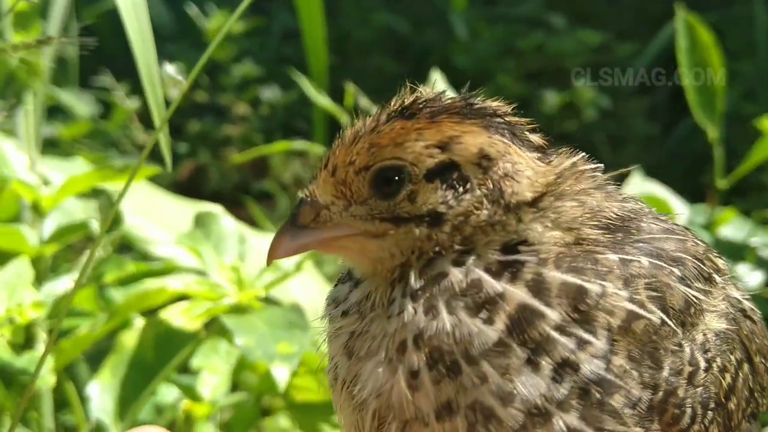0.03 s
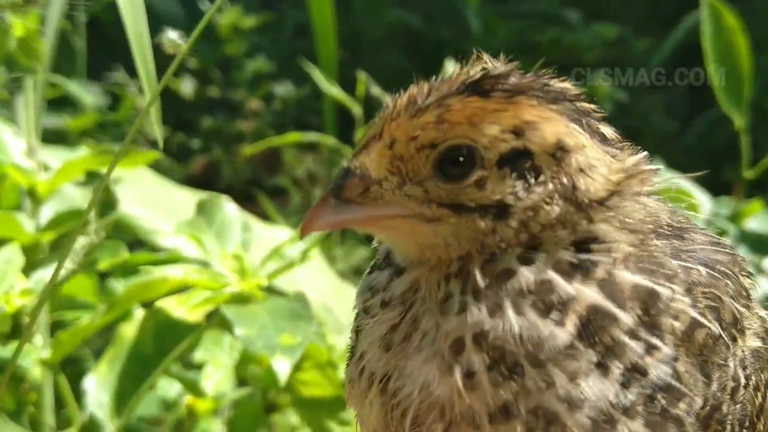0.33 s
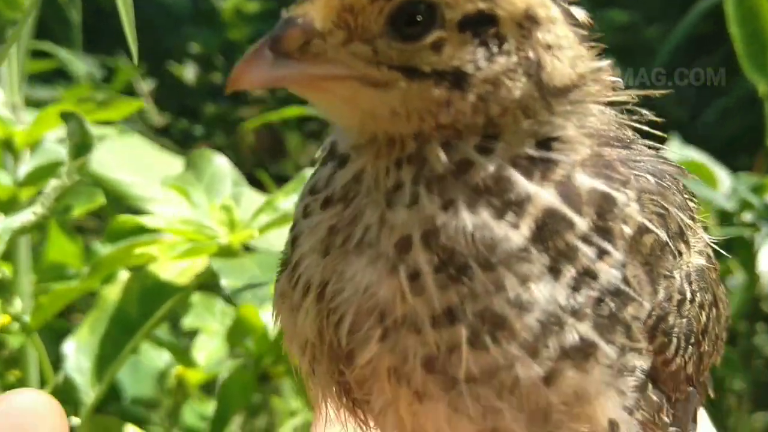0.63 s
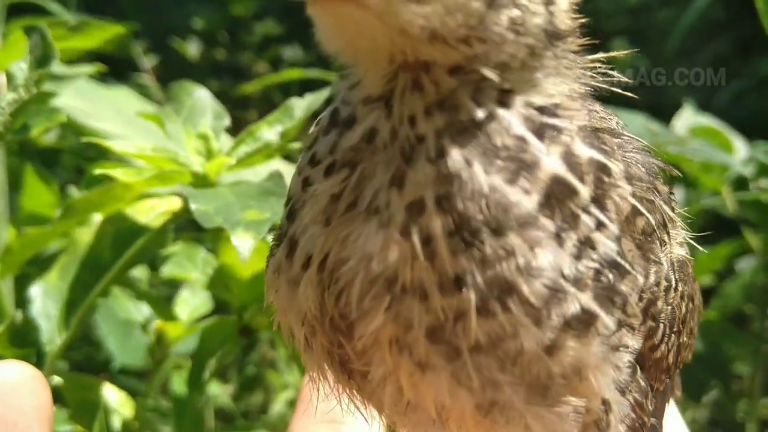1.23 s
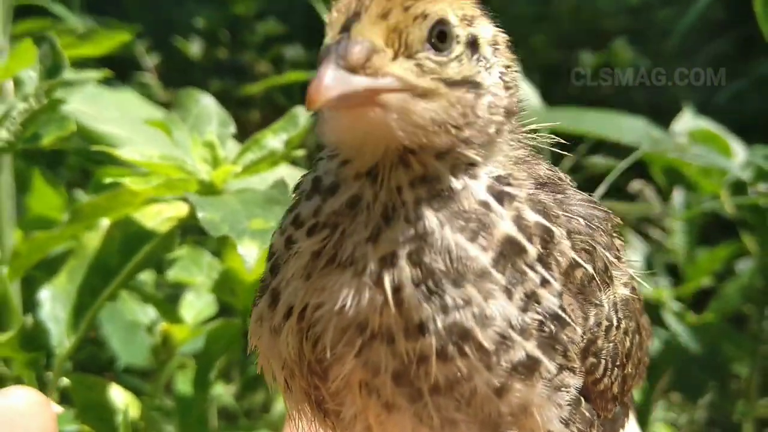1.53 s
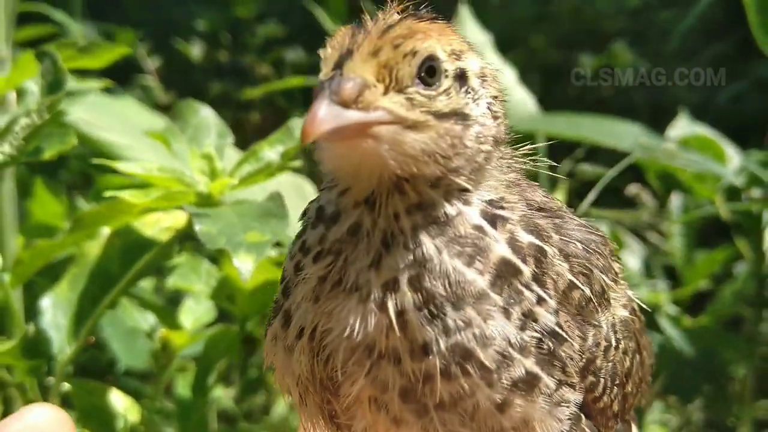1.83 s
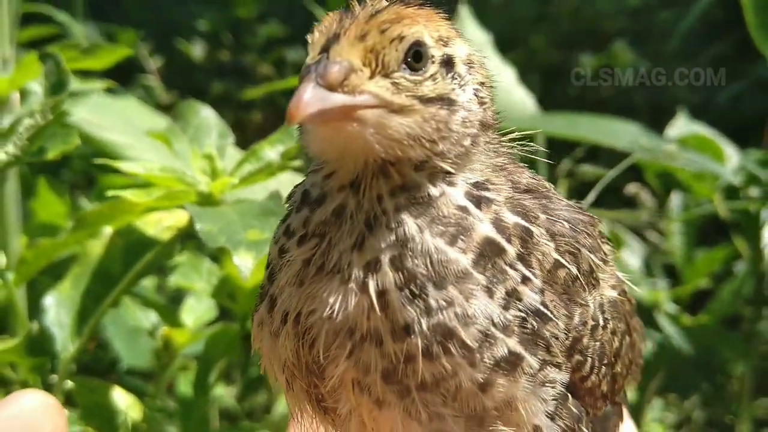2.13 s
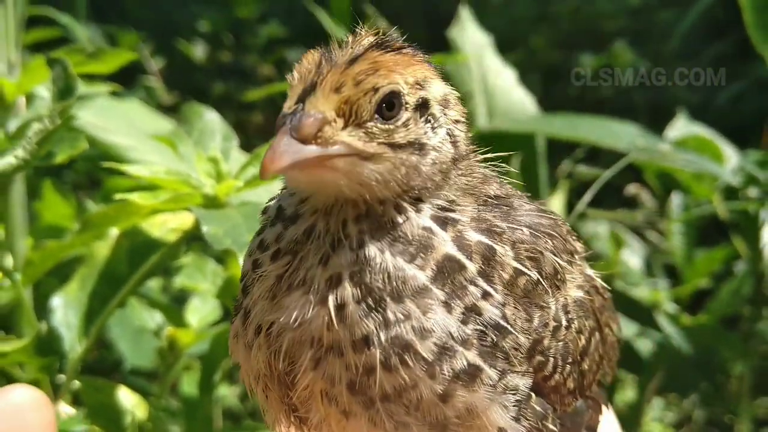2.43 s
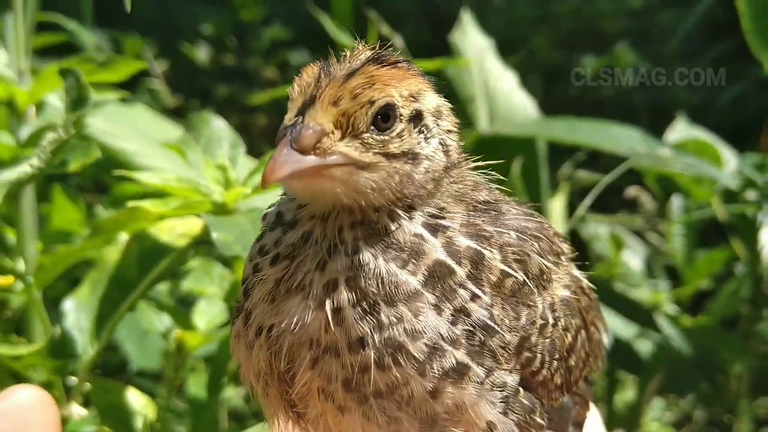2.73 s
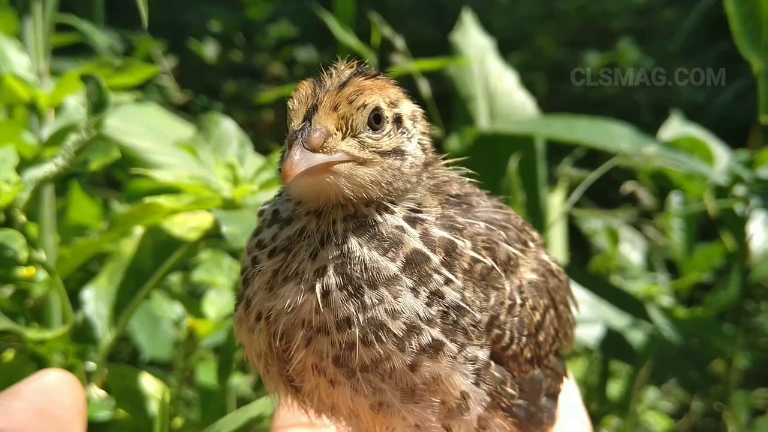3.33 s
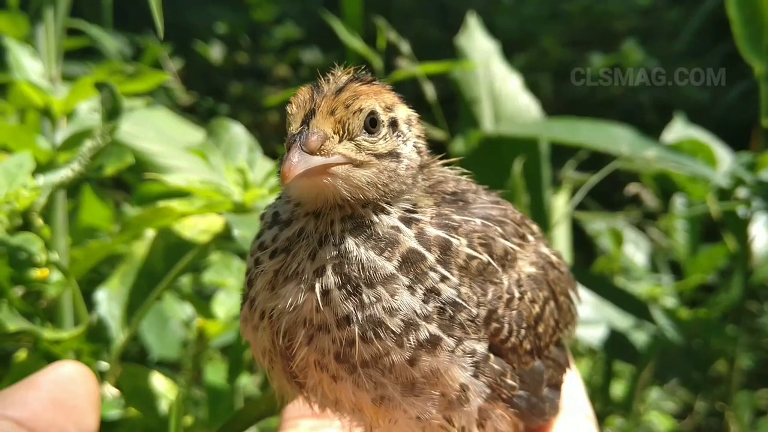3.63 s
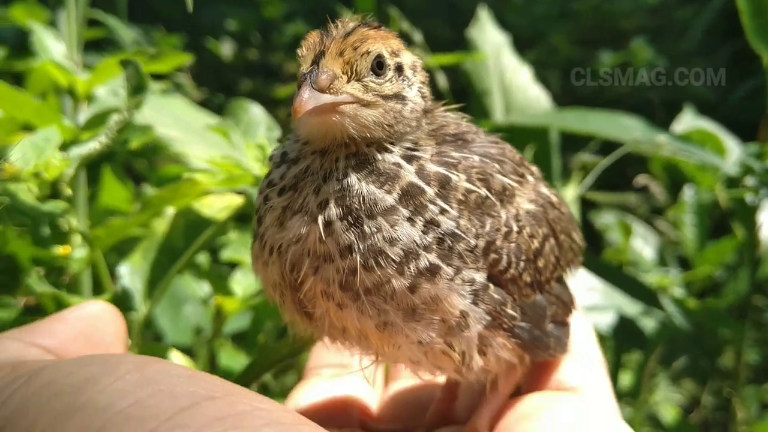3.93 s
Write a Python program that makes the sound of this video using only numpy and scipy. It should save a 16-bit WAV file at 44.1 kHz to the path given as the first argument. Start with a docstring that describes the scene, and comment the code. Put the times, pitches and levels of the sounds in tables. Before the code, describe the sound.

Low bird trills sound three times from far off in a leafy outdoor spot. Faint high chirps and a thin buzz come and go above airy hiss and a distant drone, with soft handling thuds, mostly near the end.

```python
"""Distant trills among trees

A far-off bird gives three low, rolling trills, each a train of short falling notes that the foliage
scatters and echoes. Small birds chirp in gliding whistles and a thin buzzy call comes and goes.
Beneath lie steady air noise, a low drone like a distant engine and soft bumps on the camera body.
One microphone feeds both channels: the left carries everything, the right little but the bass."""
import sys
import numpy as np
from scipy import signal
from scipy.fft import rfft, irfft
from scipy.io import wavfile
from scipy.ndimage import uniform_filter1d

SR = 44100
rng = np.random.default_rng(int(sys.argv[2]) if len(sys.argv) > 2 else 0)


def master_out(mix):
    """Clip the mix to full scale and print it as 16-bit PCM to the path in sys.argv[1]."""
    frames = np.transpose(np.atleast_2d(mix))
    ceiling = np.clip(frames, -1, 1)
    pcm = np.round(ceiling * 32767).astype(np.int16)
    wavfile.write(sys.argv[1], SR, pcm)


N = 176400

# Spectrum of the air noise. Each row: frequency in Hz, relative spectral level in dB.
AIR_SPECTRUM = [(15, 6), (30, 6.5), (45, 21), (110, 15), (150, 10), (200, 5.5), (260, 1), (400, -3),
                (700, 0), (1000, 1), (1300, -0.5), (1700, -3.5), (2600, -8.5), (4500, -7.5), (7000, -12.5),
                (7600, -15), (8100, -26)]
# Course of the air's treble. Each row: time in seconds, gain in dB.
HISS_GAIN = [(0, 0.5), (.7, 0.5), (2, -0.5), (3, -1.5), (4, -2)]
# Faint far-off swells. Each row: centre and spread in seconds, frequency and width in Hz, level in dB.
SWELLS = [(.68, .35, 1400, 220, -68), (.68, .25, 1850, 420, -66.5), (.78, .042, 740, 177, -59),
          (.04, .06, 1600, 420, -64.5), (3.06, .14, 1600, 480, -65)]
# Three groups of drone partials. Each row: multiple of the engine cycle, relative level in dB.
LOW_PARTIALS = [(3, -2), (4, -11)]
MID_PARTIALS = [(4.996, 0)]
HIGH_PARTIALS = [(6, 2), (7, 0), (8, -18.5), (9, -16.5), (10, -16), (11, -19)]
# Course of each group. Each row: time in seconds, level in dB.
LOW_LEVEL = [(0, -46), (.45, -55), (1.103, -50.5), (1.549, -45), (2.1, -52), (2.349, -44), (2.7, -50.5),
             (3.3, -54), (3.601, -48.5), (4, -49)]
MID_LEVEL = [(0, -66.5), (0.601, -48.5), (1.15, -64), (2.099, -48), (2.4, -58.5), (2.798, -45),
             (3.301, -54), (4, -54.5)]
HIGH_LEVEL = [(0, -45.5), (0.301, -49.5), (0.648, -44.5), (1.102, -47.5), (1.598, -53), (2.298, -47),
              (2.852, -56), (3.099, -47), (3.4, -58), (4, -59)]
# Knocks on the camera. Each row: start in seconds, peak level in dB.
BUMPS = [(0.823, -42), (1.687, -42), (3.032, -33), (3.124, -43.5), (3.424, -50), (3.868, -43.5),
         (3.927, -42)]
# Modes of the camera body. Each row: frequency in Hz, relative level in dB, 60 dB decay time in seconds.
BODY_MODES = [(107, 0.5, 0.078), (163, 3.5, 0.073), (230, -1.5, 0.041), (338, -3.5, 0.025)]
# Bursts of the buzz. Each row: start and length in seconds, level in dB.
BUZZES = [(1.225, 0.16, -75), (1.56, 0.16, -72), (1.867, 0.3, -70), (2.23, 0.13, -75.5),
          (2.575, 0.073, -73), (2.86, 0.24, -78), (3.102, 0.2, -75), (3.49, 0.081, -72.5),
          (3.738, 0.17, -75)]
# Partials of the buzz. Each row: frequency in Hz, relative level in dB.
BUZZ_PARTIALS = [(2808, -4), (3164, -0.5), (3503, -3)]
# Small birds' chirps. Each row: start and length in seconds, first and last pitch in Hz,
# direct peak level in dB, rasp as a fraction of the pitch.
CHIRPS = [(0.581, 0.09, 7650, 7480, -72.5, 0.013), (0.634, 0.093, 7110, 6720, -58.5, .011),
          (0.69, .06, 6990, 5210, -57.5, .028), (.712, 0.036, 6970, 6650, -59.5, .018),
          (0.983, 0.098, 5500, 5290, -70, 0.022), (1.257, 0.11, 5480, 5220, -68.5, 0.029),
          (1.661, 0.044, 5800, 7210, -65.5, .035), (1.774, .045, 6680, 7380, -65.5, 0.026),
          (1.977, 0.033, 5660, 6020, -61, 0.02), (2, 0.031, 5730, 6470, -68.5, .025),
          (2.078, 0.038, 6210, 6770, -67, 0.028), (2.099, .18, 5690, 5490, -72.5, .014),
          (2.261, .094, 4830, 4470, -66.5, .045), (2.45, 0.051, 3830, 4260, -64.5, 0.048),
          (2.573, .18, 5650, 5620, -71.5, .014), (2.65, .07, 5040, 4340, -67.5, .05),
          (2.826, .06, 3910, 4250, -65.5, .035), (3.683, .018, 6490, 5260, -67.5, .05)]
# Low trills. Each row: start and length in seconds, level in dB, swell in dB, pitch in Hz,
# gain into the echoes and reverberation in dB.
TRILLS = [(-.038, .375, -48.8, 14, 1168, -4.5), (1.433, .225, -44.4, 4.5, 1170, .5),
          (2.733, .255, -44.7, 3.5, 1175, .5)]
# Echoes from the trees. Each row: delay in seconds, gain in dB, 60 dB decay time in seconds.
ECHOES = [(.165, -10.5, .15), (.36, -17.5, .22)]
# Passbands of the right channel, one list a lobe. Each row: frequency in Hz, gain in dB.
RIGHT_LOBES = [
    [(0, 0), (380, 0), (470, -5.5), (520, -10.5), (540, -41.5)],
    [(540, -25.5), (590, -10.5), (720, -3.5), (900, -6), (1020, -9.5), (1100, -44)],
    [(1100, -47.5), (1180, -37.5), (1240, -12), (1350, -18), (1420, -15), (1500, -53.5)],
    [(1740, -50), (1810, -33.5), (2290, -21.5), (2350, -55)],
    [(2350, -53.5), (2430, -34.5), (2660, -38.5), (2760, -71.5)],
]


def undb(db):
    """Amplitude ratio of a level in decibels."""
    return 10 ** (np.asarray(db) / 20)


def unit(x):
    """Normalisation to an rms of 1."""
    return x / np.sqrt(np.mean(x ** 2) + 1e-30)


def curve(rows):
    """Gain over time, interpolated in decibels."""
    return undb(np.interp(np.arange(N) / SR, *np.array(rows).T))


def add(out, start, x):
    """Superposition of x on out from a start in seconds."""
    i = int(start * SR)
    x, i = x[max(-i, 0):], max(i, 0)
    out[i:i + len(x)] += x[:max(len(out) - i, 0)]


def bins():
    """Frequencies of the Fourier components in Hz."""
    return np.arange(N // 2 + 1) * SR / N


def noise(gain):
    """Random phases turn an amplitude spectrum into noise of rms 1."""
    return unit(irfft(gain * np.exp(2j * np.pi * rng.random(N // 2 + 1)), N))


def band(hz, width_hz):
    """Narrow-band noise: the wider its Gaussian spectrum, the faster it fluctuates."""
    return noise(np.exp(-((bins() - hz) / width_hz) ** 2 * 2))


def scatter(x, t60, smoothing_hz=70):
    """Diffuse reflection from leaves and trunks: an exponential decay, even in colour, at the rms of x."""
    t = np.arange(N) / SR
    spectrum = rfft(rng.standard_normal(N) * np.exp(-np.log(1000) * t / t60))
    local_power = uniform_filter1d(np.abs(spectrum) ** 2, int(smoothing_hz * N / SR))
    response = irfft(spectrum / np.sqrt(local_power), N)[:2 * SR]
    return unit(signal.fftconvolve(x, response)[:N]) * np.sqrt(np.mean(x ** 2))


def air(level_db=-52, crossover_hz=1500, flicker_db=0.91):
    """Broadband outdoor noise: steady rumble, slightly flickering hiss and faint distant swells."""
    hz, db = np.array(AIR_SPECTRUM).T
    bed = noise(undb(np.interp(np.log(bins() + 1), np.log(hz), db))) * undb(level_db)
    bass = irfft(rfft(bed) / (1 + (bins() / crossover_hz) ** 4), N)
    out = bass + (bed - bass) * curve(HISS_GAIN) * undb(flicker_db * band(1.9, 5.5))
    t = np.arange(N) / SR
    for centre, spread, swell_hz, width_hz, swell_db in SWELLS:
        out += undb(swell_db) * np.exp(-((t - centre) / spread) ** 2) * band(swell_hz, width_hz)
    return out


def drone(cycle_hz=16.72, wander=0.012, flutter=1.1):
    """Harmonics of a slow engine cycle beat with narrow noise bands; three groups swell and fade."""
    phase = 2 * np.pi * np.cumsum(cycle_hz * (1 + wander * band(0, 1.98))) / SR
    out = np.zeros(N)
    groups = (LOW_PARTIALS, LOW_LEVEL), (MID_PARTIALS, MID_LEVEL), (HIGH_PARTIALS, HIGH_LEVEL)
    for partials, levels in groups:
        group = np.zeros(N)
        for multiple, db in partials:
            tone = unit(np.sin(round(multiple) * phase + 2 * np.pi * rng.random()))
            group += undb(db) * (tone + flutter * band(multiple * cycle_hz, width_hz=10))
        out += unit(group) * curve(levels)
    return out


def bumps():
    """Impact excitation: fingers knock the camera body, whose damped modes give a brief thud."""
    out, t = np.zeros(N), np.arange(SR // 10) / SR
    thud = sum(undb(db) * np.sin(2 * np.pi * hz * t) * np.exp(-np.log(1000) * t / t60)
               for hz, db, t60 in BODY_MODES)
    for start, db in BUMPS:
        add(out, start, -undb(db) * thud / np.abs(thud).max())
    return out


def buzzes(hold_db=-71.3):
    """Amplitude modulation: three close partials, perhaps an insect, throb above a held level."""
    envelope = undb(hold_db) * (np.arange(N) / SR > BUZZES[0][0])
    for start, length, db in BUZZES:
        add(envelope, start, undb(db) * signal.windows.tukey(int(length * SR), .5))
    return envelope * unit(sum(undb(db) * band(hz, width_hz=44) for hz, db in BUZZ_PARTIALS))


def chirps(bend=1.3, reflections_db=6.5):
    """Frequency modulation by noise roughens gliding whistles, half lost in their own reflections."""
    out, jitter = np.zeros(N), band(0, width_hz=287)
    for start, length, first_hz, last_hz, db, rasp in CHIRPS:
        progress = np.linspace(0, 1, int(length * SR))
        glide = first_hz + (last_hz - first_hz) * progress ** bend
        pitch = glide * (1 + rasp * jitter[int(start * SR):][:len(progress)])
        whistle = np.sin(2 * np.pi * np.cumsum(pitch) / SR)
        add(out, start, undb(db) * np.sin(np.pi * progress) * whistle)
    return out + undb(reflections_db) * scatter(out, t60=0.54)


def trill(start, length, swell_db, hz, notes_per_s=27.3, note_s=.021, glide=.3, throat_width_hz=335):
    """Source and filter: a swelling roll of short falling notes passes one narrow throat resonance."""
    attack_s, attack_db, release_s, release_db = .036, -10, .05, -5
    pitch_jitter, timing_jitter_s = .015, .003
    call, progress = np.zeros(N), np.linspace(0, 1, int(note_s * SR))
    for k, (late, accent_db, detune) in enumerate(rng.standard_normal((16, 3))):
        age = k / notes_per_s
        if age > length:
            break
        pitch = hz * (1 + pitch_jitter * detune + glide * (.5 - progress))
        note = np.sin(2 * np.pi * np.cumsum(pitch) / SR) * signal.windows.tukey(len(progress), .5)
        effort_db = -swell_db * (1 - age / length) ** 0.76
        effort_db += attack_db * max(1 - age / attack_s, 0)
        effort_db += release_db * max(1 - (length - age) / release_s, 0)
        add(call, start + age + timing_jitter_s * late, note * undb(effort_db + accent_db))
    return irfft(rfft(call) / np.sqrt(1 + (2 * (bins() - hz) / throat_width_hz) ** 10), N)


def distant_trills(direct_db=-5.5, tail_db=-7.5):
    """Multipath propagation: the trees blur each trill, then return echoes and a reverberant tail."""
    near, carried = np.zeros(N), np.zeros(N)
    for start, length, db, swell_db, hz, carry_db in TRILLS:
        call = trill(start, length, swell_db, hz)
        blurred = unit(undb(direct_db) * call + scatter(call, t60=.17))
        arrival = blurred * undb(db) * np.sqrt(length * SR / N)  # level refers to the call's length
        near += arrival
        carried += arrival * undb(carry_db)
    far = undb(tail_db) * scatter(carried, t60=1.15)
    for delay, echo_db, t60 in ECHOES:
        add(far, delay, scatter(carried, t60) * undb(echo_db))
    return near + far


def scene():
    """Superposition: all sources sum at one microphone, which feeds both channels."""
    mono = distant_trills() + chirps() + buzzes() + drone() + air() + bumps()
    return np.array([mono, mono])


def record(dry, leak_db=-39, top_hz=8100):
    """Filtering: the right channel keeps the bass and a few weak bands; both lose the top."""
    gain = undb(leak_db) * (bins() > RIGHT_LOBES[-1][-1][0])
    for k, lobe in enumerate(RIGHT_LOBES):
        lobe_db = np.interp(bins(), *np.array(lobe).T, left=-np.inf, right=-np.inf)
        gain += (-1) ** k * undb(lobe_db)  # lobes alternate in polarity
    both = np.array([dry[0], irfft(rfft(dry[1]) * gain, N)])
    return signal.sosfilt(signal.ellip(10, .2, 70, top_hz, fs=SR, output="sos"), both)


dry = scene()
out = record(dry)
master_out(out)
```